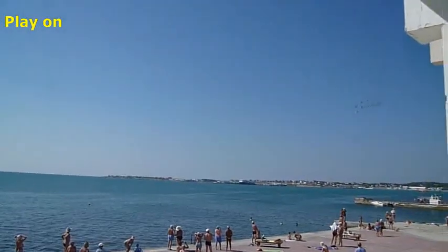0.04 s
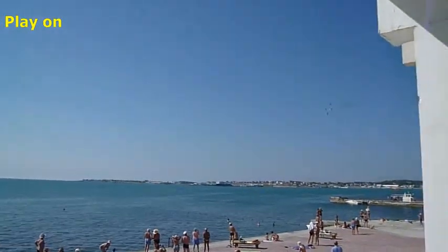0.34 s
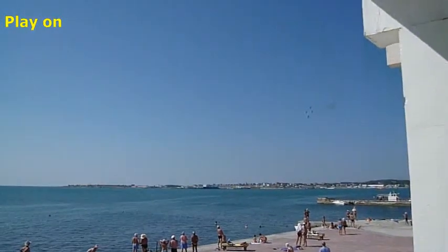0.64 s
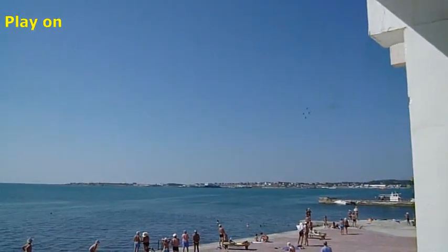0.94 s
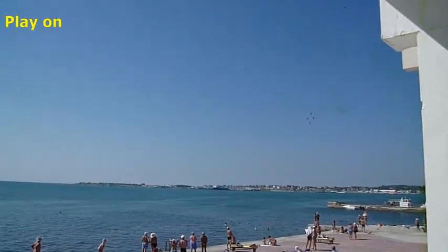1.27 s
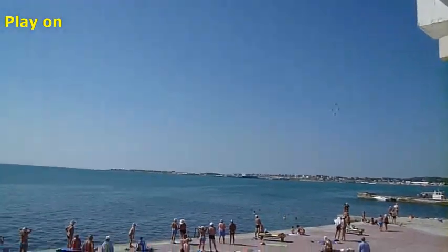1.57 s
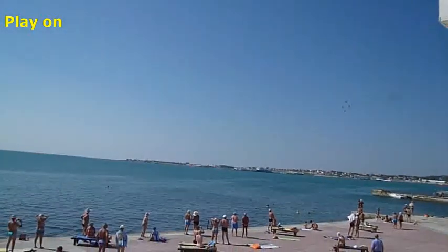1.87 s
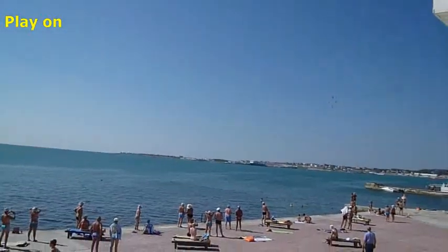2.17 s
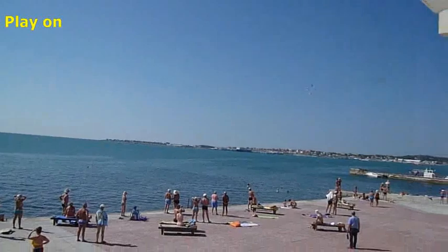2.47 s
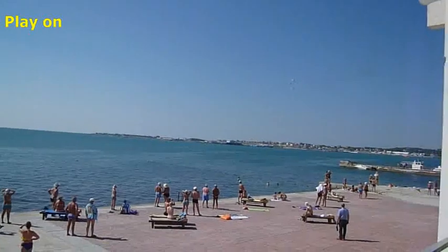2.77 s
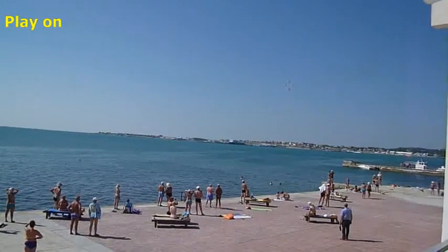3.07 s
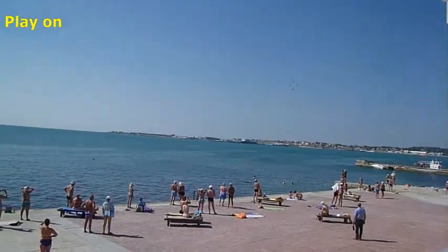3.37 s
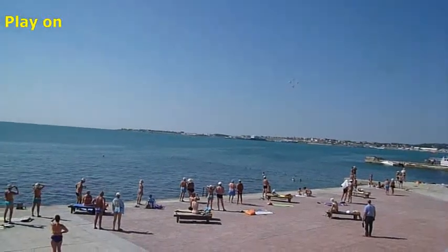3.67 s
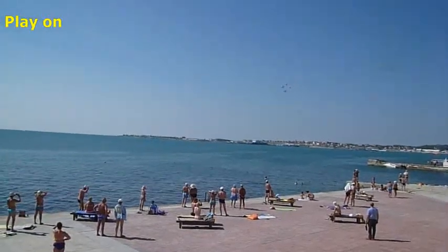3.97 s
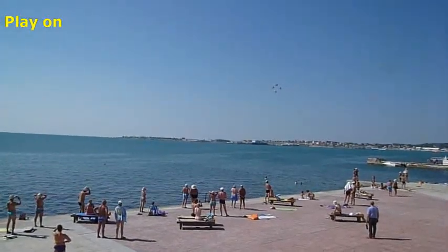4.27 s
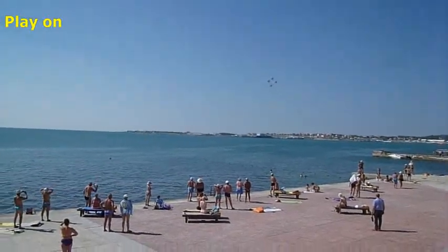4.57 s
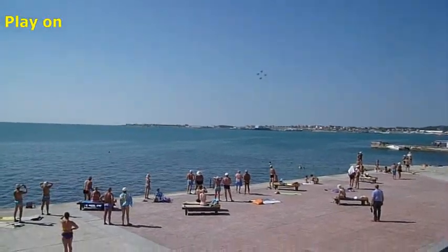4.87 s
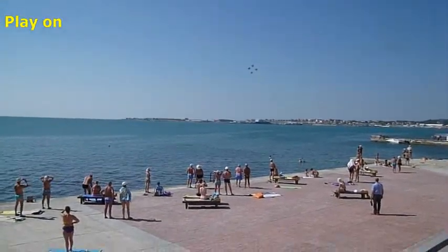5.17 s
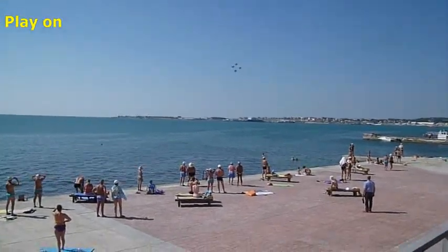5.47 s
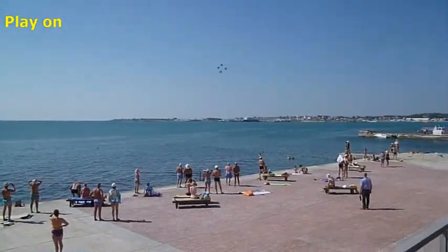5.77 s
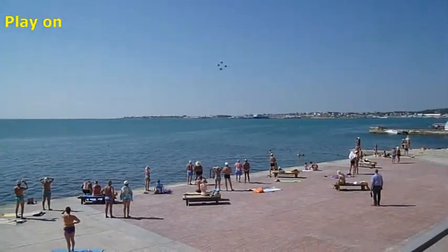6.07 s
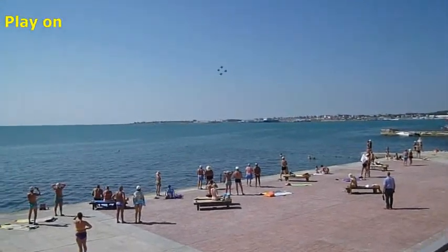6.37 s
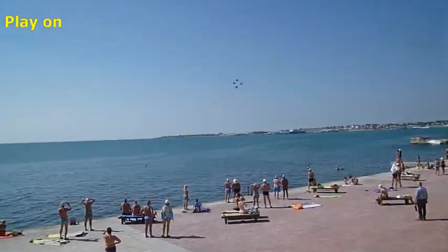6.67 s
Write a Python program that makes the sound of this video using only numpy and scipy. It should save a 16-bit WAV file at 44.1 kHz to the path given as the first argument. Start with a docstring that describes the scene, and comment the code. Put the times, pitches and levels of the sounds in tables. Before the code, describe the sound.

A continuous low roar of several jet aircraft above a beach, with a swelling rush and light microphone crackle.

```python
"""Distant jets over the sea

A formation of jet fighters is heard from a balcony above a beach. Exhaust eddies roar around one drifting
pitch, with a deep rumble that grows and a rush that swells and fades. Reflections sweep through the sound
and the balcony rings faintly, over a low bed of breeze and sea. The small camera hisses, whines and
crackles lightly as the loud roar overloads it."""
import sys
import numpy as np
from scipy.fft import rfft, irfft, next_fast_len
from scipy.io import wavfile
from scipy.ndimage import uniform_filter1d, minimum_filter1d, map_coordinates

SR = 44100
rng = np.random.default_rng(int(sys.argv[2]) if len(sys.argv) > 2 else 0)


def generate_wav(signal):
    """Clip the signal to [-1, 1] and save it as 16-bit WAV at the path in sys.argv[1]."""
    frames = np.transpose(np.atleast_2d(signal))
    scaled = np.clip(frames, -1, 1) * 32767
    pcm = np.round(scaled).astype(np.int16)
    wavfile.write(sys.argv[1], SR, pcm)


N = 301644

# the exhaust rush swelling and fading, strongest just after 3 s: t/s, level/dB
RUSH_SURGE = [(0, -25.5), (0.5, -27), (0.87, -27), (1.3, -25.5), (1.5, -22), (1.65, -22), (1.73, -25),
              (2.0, -24), (2.27, -24.5), (2.42, -21.5), (3.25, -21), (3.58, -25.5), (3.87, -23.3),
              (4.4, -26), (5.3, -27), (5.55, -24.5), (6.35, -27.5), (6.6, -23.5), (6.84, -27)]
# the highest crests of the roar, each making the microphone tick: t/s, relative tick level/dB
CREST_TICKS = [(0.2297, -41), (0.4072, -43), (0.7251, -46), (0.7851, -43), (1.0859, -39), (1.6535, -35),
               (1.9983, -40), (2.1272, -42), (2.1488, -42), (2.5113, -45), (2.6307, -42), (2.6528, -43),
               (2.7626, -41), (2.8998, -41), (2.9732, -38), (3.007, -39), (3.0411, -44), (3.1412, -41),
               (3.3161, -42), (3.3456, -42), (3.403, -41), (3.4341, -40), (3.5552, -44), (3.8064, -43),
               (3.8309, -38), (3.9463, -44), (3.9514, -43), (4.104, -45), (4.3001, -43), (4.3091, -40),
               (4.5281, -42), (4.5996, -41), (4.9731, -45), (5.0352, -43), (5.2593, -41), (5.3051, -41),
               (5.5258, -43), (5.5797, -36), (5.7605, -45), (5.8472, -43), (5.8763, -43), (6.0192, -41),
               (6.0901, -44), (6.2586, -44), (6.3428, -44), (6.4147, -45), (6.4731, -39), (6.6106, -39),
               (6.6259, -40)]


def roar():
    """Exhaust eddies roar around one drifting pitch; a narrow core stands out as the formation turns."""
    # centre of the roar: t/s, f/Hz
    pitch = [(0, 177.6), (.3, 188), (.6, 218.2), (1.1, 211.7), (1.6, 228), (2.1, 210.6), (2.8, 225.1),
             (3.4, 210.2), (4.2, 207.3), (5, 195.8), (5.6, 208.1), (6.2, 186.1), (6.84, 171.1)]
    # the roar holds, then gives way at the end: t/s, level/dB
    roar_level = [(0, -20), (.6, -19.5), (1.1, -20), (2.2, -21.5), (3.3, -20), (4.9, -19), (5.7, -19.5),
                  (6, -19), (6.35, -19), (6.6, -24)]
    # the core against the wider band: t/s, level/dB
    core_level = [(0, -14.5), (.7, -6), (3, -6), (3.7, -1), (5.2, 0), (5.7, -1.5), (6.3, -6), (6.84, 2.5)]
    centre_hz, = curves(pitch)
    roar_db, = curves(roar_level)
    core_db, = curves(core_level)
    eddies = steady(balcony(narrow_band(centre_hz, width_hz=40, steepness=2.78)), span=0.1)
    core = steady(balcony(narrow_band(centre_hz, width_hz=17, steepness=6)), span=0.092)
    return amp(roar_db - 0.5 + 0.7 * wobble(14)) * (eddies + amp(core_db) * core)


def roar_swells():
    """Parts of the roar swell for a moment, each around its own pitch, and sink back."""
    # brief swells: t/s, f/Hz, level/dB, half length/s
    swells = [(0.124, 142, -24, 0.36), (0.433, 375, -25.5, 0.099), (0.654, 270, -20.5, .12),
              (1.088, 385, -29.5, 0.18), (1.148, 204.6, -24.5, 0.13), (1.616, 258, -18, 0.052),
              (1.622, 425, -27, .07), (1.966, 210, -19, 0.068), (2.13, 215, -18.5, .04),
              (2.427, 160, -19.5, .16), (2.439, 560, -30.5, 0.18), (2.64, 380, -23, 0.079),
              (3.15, 299.7, -26, 0.15), (4.1, 112, -22, 0.085), (4.501, 115, -25, 0.099),
              (5.58, 370, -26.5, 0.19), (5.627, 275, -23.5, 0.12), (6.151, 250, -26, .2),
              (6.353, 182, -13, 0.075)]
    return sum(bumps([s], [amp(db)], half) * steady(narrow_band(hz, width_hz=24, steepness=5.6), span=0.38)
               for s, hz, db, half in swells)


def rumble():
    """The largest exhaust eddies: a low end that grows as the formation turns."""
    # tone of the rumble: f/Hz, level/dB
    spectrum = [(55, -43), (72, -21), (85, 1), (94, -3.5), (102, -3), (120, 2), (148, -4.5), (175, -8.5),
                (260, -37)]
    # its build: t/s, level/dB
    build = [(0, -34), (0.9, -28), (1.7, -30), (1.95, -28.5), (3.3, -26), (3.7, -21), (5.2, -24.5),
             (5.85, -19.5), (6.4, -22.5), (6.65, -19)]
    level_db, = curves(build)
    return amp(level_db + 0.48 + 0.55 * wobble(18)) * steady(balcony(noise(spectrum)), span=0.18)


def rush(flutter):
    """Mid-sized eddies ride the surge: a full body, and a hollow layer above it that gains steadily."""
    # body of the rush: f/Hz, level/dB
    body_spectrum = [(150, -23.5), (260, 2.5), (330, -1), (440, -2), (540, -5), (640, -13), (800, -33),
                     (1200, -63.5)]
    # its hollow upper layer: f/Hz, level/dB
    hollow_spectrum = [(400, -28.5), (560, -2.5), (680, 1.5), (780, 1.5), (900, -2.5), (1030, -9),
                       (1140, -19), (1500, -44.5), (2500, -70)]
    t = np.arange(N) / SR
    surge_db, = curves(RUSH_SURGE)
    rise_db_per_s = 0.78
    body = amp(surge_db + 0.84 + 0.22 * flutter) * steady(balcony(noise(body_spectrum)), span=0.2)
    hollow = amp(surge_db - 12 + rise_db_per_s * t + 0.5 * flutter) * noise(hollow_spectrum)
    return body + hollow


def tear(flutter):
    """Small eddies: a tearing top that swings less than the surge, flares once and dulls with distance."""
    # tone of the tearing top: f/Hz, level/dB
    spectrum = [(700, -34), (1050, -3.5), (1150, -0.5), (1240, 1), (1360, -0.5), (1560, 0), (1800, -6),
                (2100, -16), (2500, -18.5), (3200, -31.5), (5000, -40)]
    t = np.arange(N) / SR
    surge_db, = curves(RUSH_SURGE)
    surge_share, fall_db_per_s = 0.8, 0.07
    level_db = -25 + surge_db.mean() + surge_share * (surge_db - surge_db.mean()) - fall_db_per_s * t
    flare_db = bumps(times=[1.56], heights=[1.5], half_s=0.091)
    return amp(level_db + flare_db + 0.55 * flutter + 0.42 * wobble(70)) * noise(spectrum)


def rasp():
    """The finest grain of the exhausts follows the surge and is soon lost in the air."""
    # tone of the rasp: f/Hz, level/dB
    spectrum = [(1300, -24), (1600, 3.5), (2000, 0.5), (2600, -3), (3500, -8.5), (5000, -12.5),
                (8000, -21.5)]
    t = np.arange(N) / SR
    surge_db, = curves(RUSH_SURGE)
    fall_db_per_s = 6.5
    level_db = -57.5 - fall_db_per_s * t + surge_db - surge_db.mean()
    return amp(level_db + 1.5 * wobble(120)) * noise(spectrum)


def whistle():
    """The turbines' thin, breathy note, clearest at the start."""
    # the slowly rising note: t/s, f/Hz, level/dB
    note = [(0, 972, -47), (.4, 976, -50), (.8, 1003, -57), (1.4, 1013, -56.5), (1.85, 1029, -47),
            (2.3, 1027, -62), (3.4, 1054, -66)]
    hz, db = curves(note)
    return amp(db) * steady(narrow_band(hz, width_hz=15, steepness=6.6), span=0.36)


def jets():
    """All layers of the formation with their reflections; moving air makes the exhausts flutter."""
    # brief dips in the level of the jets: t/s, depth/dB
    dips = [(0.82, 1), (0.97, 1), (1.51, 2), (1.71, 3.5), (2.25, 1), (2.8, 1.5), (4.63, 4), (5.17, 1),
            (5.359, 4)]
    dip_db = bumps(*np.transpose(dips), half_s=0.04)
    flutter = wobble(22)
    exhausts = rumble() + roar() + rush(flutter) + tear(flutter) + rasp() + roar_swells()
    return amp(-dip_db) * reflected(exhausts + whistle())


def crests(x):
    """Now and then the eddies pile up into one steep pressure crest, one cycle long."""
    min_height, cycle_hz = 0.39, 215
    t, out = np.arange(N) / SR, x.copy()
    for s, _ in CREST_TICKS:
        at = round(s * SR)
        near = slice(at - SR // 50, at + SR // 50)
        lift = np.sign(out[at]) * max(abs(out[at]), min_height) - out[at]
        u = (np.pi * cycle_hz * (t[near] - s)) ** 2
        out[near] += lift * (1 - 2 * u) * np.exp(-u)
    return out


def balcony(x):
    """Standing waves between the walls add a faint ring to the direct sound."""
    # balcony resonances: f/Hz, width/Hz, level/dB
    modes = [(111, 12, -11), (177, 12, -1), (216.3, 1.7, -4), (250, 28, -9), (363.8, 10, 0),
             (408.5, 8.1, -2), (444.7, 10, -6.5), (586, 18, -5.5)]
    ring = lambda f: sum(amp(db) * 1j * f * w / (c * c - f * f + 1j * f * w) for c, w, db in modes)
    return filtered(x, lambda f: 1 + ring(f))


def reflected(x):
    """A shifting bounce off the paving sweeps soft bands through the roar; the building adds a slap."""
    # the paving bounce as jets and camera move: t/s, delay/ms, strength/0-1
    paving = [(0, 4, 0), (.6, 5.3, 0), (.9, 5.04, 0.22), (1.5, 4.52, 0.22), (2, 4.07, 0.11), (2.6, 5, 0.2),
              (3.2, 4.8, 0), (3.7, 4.36, 0.19), (4.3, 4, 0.03), (6.84, 3.84, 0.09)]
    t = np.arange(N) / SR
    paving_ms, strength = curves(paving)
    dull = filtered(x, lambda hz: 1 / (1 + (hz / 900) ** 4))
    echo = lambda ms: np.interp(t - ms / 1000, t, dull, left=0)
    wall_slap = 0.081 * echo(ms=24.5)
    return (x + strength * echo(paving_ms) + wall_slap) / (1 + strength / 2)


def shore(level_db):
    """A deep, uneven bed of breeze and sea, with one puff of wind."""
    # tone of breeze and sea: f/Hz, level/dB
    spectrum = [(15, -38.5), (28, -26), (40, -11), (52, 1.5), (62, 1), (72, -9), (120, -34.5), (300, -71)]
    gust_db = bumps(times=[1.3], heights=[6], half_s=0.046)
    return amp(level_db + gust_db + 0.83 * wobble(13)) * steady(noise(spectrum), span=0.55)


def overload_ticks(sound, gain_db, corner_hz, dull_hz, faint_db, faint_rate):
    """Overload kinks the wave: tiny dull ticks on the crests, fainter ones crowding where it is loud."""
    strain = np.minimum(sound ** 4 / np.mean(sound ** 4), 10)
    faint_hits = rng.random(N) < strain * faint_rate / SR
    kicks = faint_hits * amp(faint_db + gain_db - rng.standard_normal(N))  # 1 dB of scatter
    for s, db in CREST_TICKS:
        kicks[round(s * SR)] += amp(db + gain_db)
    kink = lambda hz: (1j * hz / corner_hz) / (1 + 1j * hz / corner_hz) ** 3
    return filtered(kicks, lambda hz: kink(hz) / np.sqrt(1 + (hz / dull_hz) ** 8) * (hz < 8300))


def limited(x, top, hold):
    """The gain ducks smoothly for about hold seconds around any crest above top."""
    size = max(int(hold * SR), 64)
    needed = top / np.maximum(np.abs(x), top)
    return x * uniform_filter1d(minimum_filter1d(needed, size), size)


def electronics(hiss_db, whine_db):
    """The camera's own hiss and thin, steady whine."""
    # tone of the hiss: f/Hz, level/dB
    hiss_spectrum = [(500, -12), (2000, 1), (3500, -2), (5000, -1), (6900, -1.5), (7700, -5), (8400, -10.5),
                     (9200, -17.5)]
    # partials of the whine: f/Hz, relative level/dB
    partials = [(3111, -79.5), (3555.5, -80), (5333.5, -84), (6222, -81.5), (6666.7, -76.5)]
    t = np.arange(N) / SR
    whine = sum(np.sqrt(2) * amp(db) * np.sin(2 * np.pi * hz * t) for hz, db in partials)
    return amp(hiss_db) * noise(hiss_spectrum) + amp(whine_db) * whine


def amp(db):
    """Decibels to gain."""
    return 10 ** (np.asarray(db) / 20)


def unit(x):
    """Scale to rms 1."""
    return x / np.sqrt(np.mean(x ** 2) + 1e-20)


def curves(rows):
    """One automation curve for each column after the time."""
    s, *cols = np.transpose(rows)
    return [np.interp(np.arange(N) / SR, s, c) for c in cols]


def bumps(times, heights, half_s):
    """An envelope of smooth bells, centred on times in seconds."""
    t = np.arange(N) / SR
    return sum(h * np.exp(-((t - s) / half_s) ** 2) for s, h in zip(times, heights))


def wobble(rate):
    """A smooth random curve, rate knots a second."""
    return map_coordinates(rng.standard_normal(int(N * rate / SR) + 4), [np.arange(N) * rate / SR])


def steady(x, span):
    """Hold x near rms 1 over span seconds; its faster flutter stays."""
    power = uniform_filter1d(np.abs(x) ** 2, max(int(span * SR), 64))
    return x / np.sqrt(np.abs(power) + 1e-20)


def filtered(x, response):
    """Pass x through a complex frequency response."""
    size = next_fast_len(N + SR // 2)
    return irfft(rfft(x, size) * response(np.fft.rfftfreq(size, 1 / SR)), size)[:N]


def noise(spectrum):
    """Noise of rms 1, coloured by (f/Hz, level/dB) points and cut above the last."""
    f, db = np.transpose(spectrum)
    colour = lambda hz: amp(np.interp(np.log(hz + 1), np.log(f + 1), db, right=-120))
    return unit(filtered(rng.standard_normal(N), colour))


def narrow_band(centre_hz, width_hz, steepness):
    """A band of noise of rms 1 around a centre that may drift."""
    phase = 2 * np.pi * np.cumsum(centre_hz * np.ones(N)) / SR
    skirt = lambda hz: (hz < 5 * width_hz) / np.sqrt(1 + (hz / width_hz) ** steepness)
    eddies = filtered(rng.standard_normal(N), skirt) + 1j * filtered(rng.standard_normal(N), skirt)
    return unit(np.real(eddies * np.exp(1j * phase)))


def scene():
    """The jets above the shore, eased in and out at the ends."""
    t = np.arange(N) / SR
    fade_s = 0.004
    ramp = np.minimum(np.minimum(t, t[::-1]) / fade_s, 1)
    ease = np.sin(np.pi / 2 * ramp) ** 2
    return (ease * crests(jets() + shore(level_db=-36.5)))[None]


def record(dry):
    """The camera limits and flattens the highest crests, adds its own noise and trims lows and highs."""
    ceiling, hardness = 0.45, 20
    low_cut_hz, top_hz = 35, 9400
    sound = limited(dry[0], top=0.48, hold=0.02)
    sound = sound / (1 + np.abs(sound / ceiling) ** hardness) ** (1 / hardness)
    ticks = overload_ticks(sound, gain_db=52, corner_hz=460, dull_hz=5500, faint_db=-51, faint_rate=44)
    sound = sound + ticks + electronics(hiss_db=-63, whine_db=-1.5)
    passband = lambda hz: (hz < top_hz) * hz ** 4 / np.hypot(hz ** 4, low_cut_hz ** 4)
    return filtered(sound, passband)[None]


dry = scene()
out = record(dry)
generate_wav(out)
```